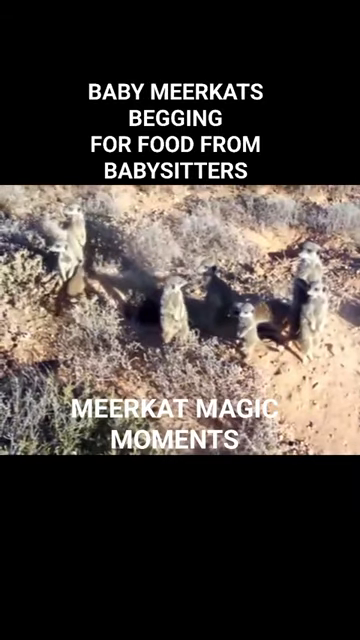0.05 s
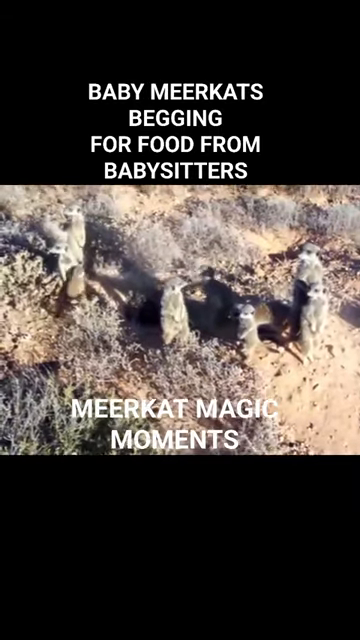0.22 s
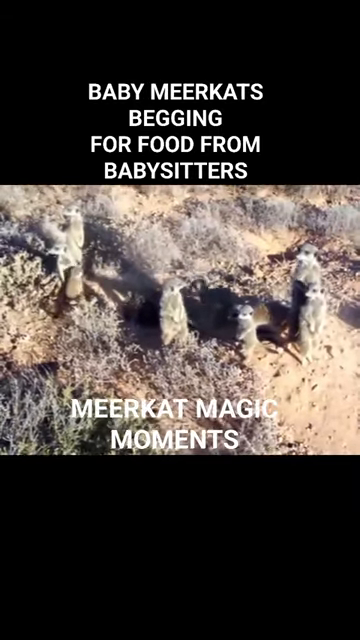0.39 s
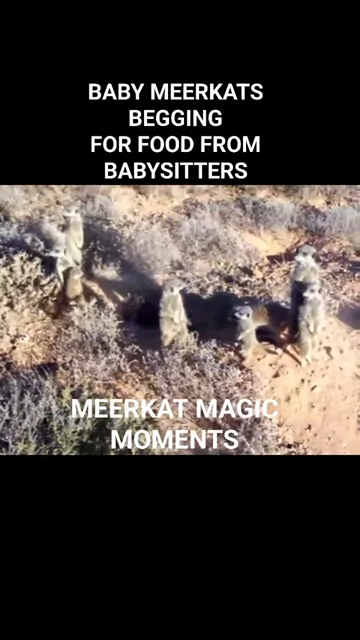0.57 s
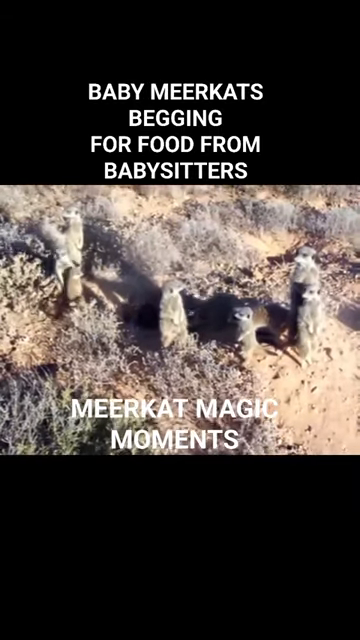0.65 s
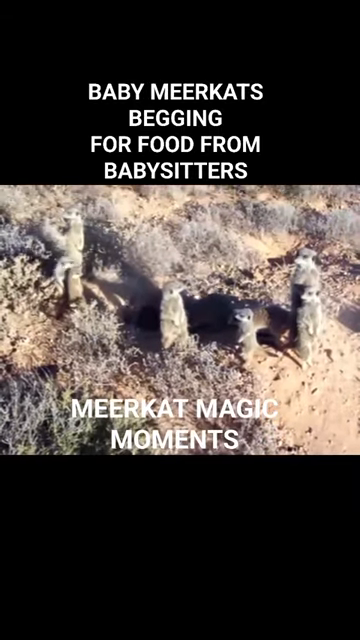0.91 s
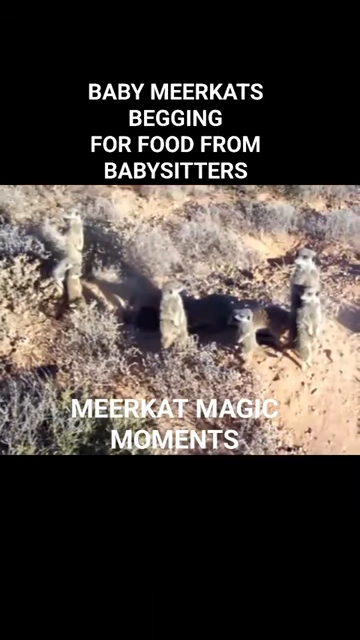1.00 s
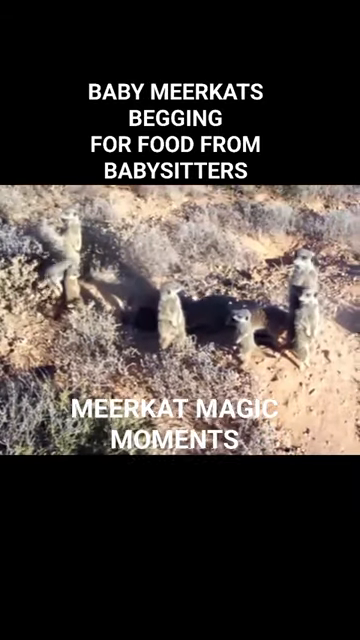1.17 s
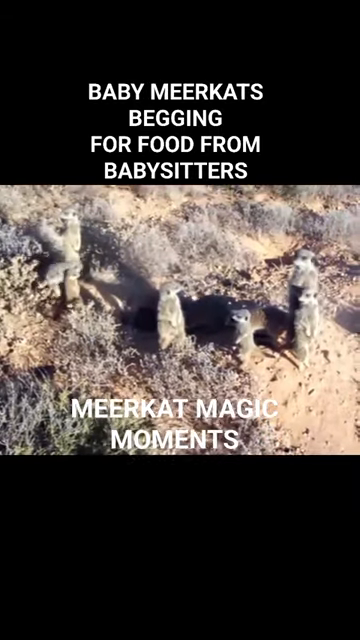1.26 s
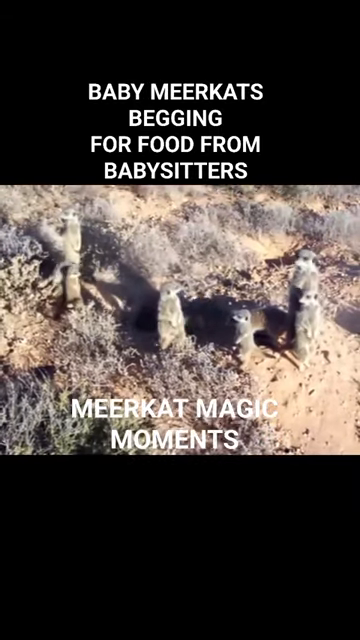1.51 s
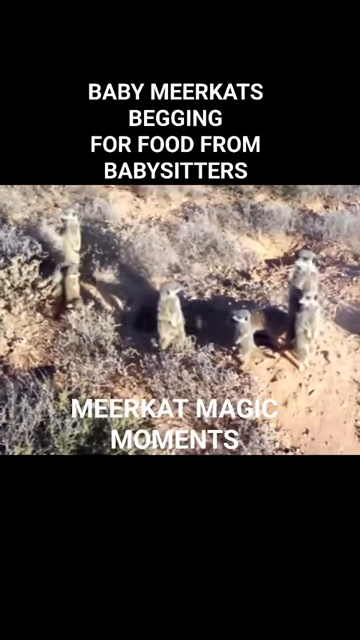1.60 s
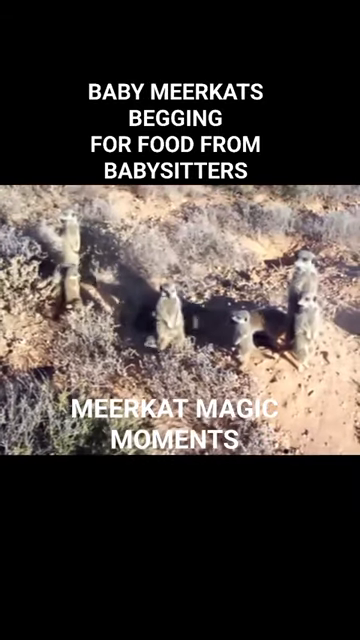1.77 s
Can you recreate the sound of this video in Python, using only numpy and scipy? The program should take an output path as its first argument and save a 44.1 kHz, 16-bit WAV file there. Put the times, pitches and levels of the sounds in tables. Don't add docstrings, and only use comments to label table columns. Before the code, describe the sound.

Outdoors on dry ground, a loud snap falls between quick pup chirps, then a meerkat pup's raspy trembling squeal lasts under a second, followed by faint chirps, leaf rustle and tiny clicks over low air noise, nearly mono.

```python
import sys
import numpy as np
from scipy import signal
from scipy.fft import rfft, irfft
from scipy.io import wavfile
from scipy.ndimage import uniform_filter1d

SR = 44100
rng = np.random.default_rng(int(sys.argv[2]) if len(sys.argv) > 2 else 0)


def amplitude_ratio(level_db):
    exponent = np.asarray(level_db, float) / 20
    return 10 ** exponent


def persist_wave(psi):
    counts = np.round(np.clip(psi, -1, 1) * 32767).astype(np.int16)
    wavfile.write(sys.argv[1], SR, np.atleast_2d(counts).T)


N = 81585
T = np.arange(N) / SR

# frequency_hz, density_db
AIR_SPECTRUM = [(22, -9.5), (75, -3), (250, -6), (530, -8), (900, -14), (1500, -15.5), (7000, -26.5),
                (11000, -35.5)]
# low_hz, high_hz,
# lost_share_of_time
SIDE_BANDS = [(4200, 4800, .95), (4800, 5400, .7), (5400, 6200, .3), (6200, 7000, .15), (7000, 7900, .1)]
# start_s, length_s, first_hz, last_hz, level_db
HOOT_TONES = [(0.024, 0.09, 535.5, 553, -59.5), (.002, 0.027, 565, 535, -62),
              (1.562, 0.0078, 907, 880, -49), (.006, 0.051, 1286, 1330, -61.5),
              (0.055, 0.035, 1250, 1288, -57.5), (0.059, 0.046, 266, 231, -54),
              (0.445, 0.044, 650, 654, -55.5), (0.45, 0.014, 6840, 7000, -63),
              (0.49, 0.037, 6680, 6500, -62.5), (0.663, 0.0293, 837, 1020, -47),
              (0.727, 0.036, 776, 802, -47.5), (0.854, 0.052, 223.6, 229, -50.5),
              (0.872, 0.02743, 855, 990, -53.5), (1.214, 0.027, 694.6, 766, -51),
              (1.223, 0.018, 1543, 1440, -50), (1.227, 0.026, 4334, 4060, -64),
              (1.539, 0.021, 813, 910, -57)]
# start_s, length_s, crest_hz, level_db, brightness_db_per_multiple above the third
ARCHED_CHIRPS = [
    (0.197, 0.0384, 1075, -44, -4.5),
    (0.331, 0.038, 974, -42.5, -5),
]
# start_s, length_s, crest_hz, level_db, brightness_db_per_multiple
RISING_CHIRPS = [
    (.463, 0.035, 892, -44.5, -5.5),
    (.649, 0.0428, 973.6, -41.5, -1.5),
    (1.412, 0.022, 894, -56.5, 2),
    (1.438, 0.0401, 948, -45, 0.5),
    (1.54, 0.038, 914, -54.5, -10),
]
# multiple, level_db
CHIRP_HARMONICS = [(1, -7.5), (2, 2.5), (3, -5.5), (4, -15), (5, -7), (6, -16.5), (10, -24.5)]
# start_s, peak_db, mode_hz, t60_s
KNOCK_MODES = [
    (.219, -24.5, 252, 0.0067),
    (.366, -41, 78.4, 0.15),
    (.685, -41.5, 244, .03),
    (1.106, -27.5, 510, 0.011),
    (1.2775, -27.5, 672, 0.02),
    (1.843, -40, 800, 0.013),
]
# start_s, length_s, centre_hz, level_db
LEAF_SWELLS = [
    (0.33, 0.03, 4250, -68),
    (1.444, 0.017, 4070, -56),
    (0.48, 0.12, 5740, -55),
    (0.724, 0.13, 6400, -51.5),
    (1.204, 0.26, 4300, -60),
    (1.424, 0.059, 4140, -53.5),
    (1.535, 0.14, 4800, -60),
]
# time_s, flutter_crest_hz, level_db, upper_resonance_hz, upper_strength_db
CALL_PATH = [(0.408, 496.2, -47, 4320, 0), (.422, 521.8, -43.5, 4320, -4.5), (.452, 726.8, -39, 4580, -5.5),
             (.545, 699.3, -41, 4550, 0), (.56, 701, -39.5, 4460, -3.5), (0.677, 704.4, -38.5, 4570, -2.5),
             (.72, 726, -39, 4520, 2.5), (0.92, 782, -38, 4380, 4.5), (1.082, 689, -38, 4330, 4),
             (1.15, 709.7, -37, 4330, 4.5), (1.226, 625, -39, 4250, 0.5)]
# time_s, beats_done
FLUTTER_BEATS = [(.402, -23), (.508, -15), (.708, 0), (.803, 7), (.907, 14), (1.011, 21), (1.122, 28),
                 (1.171, 31), (1.229, 32)]
# time_s, pitch_share_lost_in_dip, roughness_0_to_1
FLUTTER_DEPTH = [(.41, .05, .5), (.45, .24, .6), (.51, .36, .45), (.66, .36, .4), (.8, .24, .42),
                 (1.05, .17, .42), (1.1, .12, .42), (1.17, .08, .3), (1.23, .08, .35)]
# frequency_hz, gain_db
THROAT_COLOUR = [(650, -12.5), (1050, -17.5), (1300, -3), (1750, 2.5), (2300, -8.5), (2900, -8.5),
                 (3500, -18.5), (12000, -29)]
# start_s, length_s, resonance_hz, boost_db
CAVITY_RINGS = [
    (0.41, .045, 3550, 3),
    (.43, 0.035, 4870, 3),
    (0.486, 0.049, 4780, -2),
    (0.498, 0.027, 4320, 3),
    (0.549, .132, 4804, 6.5),
    (.555, .12, 4340, 4),
    (0.73, 0.27, 2760, -1),
]
# start_s, peak_db, centre_hz, decay_s
GRIT_TICKS = [
    (1.0652, -25, 4870, 0.001),
    (1.3, -39.5, 4700, 0.0069),
    (1.334, -49, 5400, .004),
    (1.397, -33.5, 4270, 0.0017),
    (1.624, -45, 5480, .003),
    (1.7976, -28.5, 4800, 0.001),
    (1.8, -36.5, 7440, 0.00069),
    (1.844, -41.5, 3170, 0.0025),
]
# from_hz, gain_db
TREBLE_LOSS = [(6800, -2), (7750, -9.5), (9700, -16), (10350, -30.5), (12150, -37), (14200, -54.5)]

SNAP_S = 0.22173
FALL_SHARE = 0.3
CALL_EDGE_S = 0.008


def at_hz(points, hz):
    points = np.array(points)
    return np.interp(np.log(hz), np.log(points[:, 0]), points[:, 1])


def rms_one(x):
    return x / np.sqrt(np.mean(x ** 2) + 1e-20)


def band(x, low_hz, high_hz):
    return signal.sosfilt(signal.butter(2, [low_hz, high_hz], "band", fs=SR, output="sos"), x)


def drift(rate_hz):
    r, run_in = np.exp(-2 * np.pi * rate_hz / SR), int(SR / rate_hz)
    noise = rng.standard_normal(N + run_in)
    return rms_one(signal.lfilter([1], [1, -2 * r, r * r], noise)[run_in:])


def gate(start_s, length_s, edge_s):
    to_nearest_end = np.minimum(T - start_s, start_s + length_s - T)
    return np.sin(np.pi / 2 * np.clip(to_nearest_end / edge_s, 0, 1)) ** 2


def resonance(hz, centre_hz, width_hz):
    return 1 / (1 + ((hz - centre_hz) / width_hz) ** 4)


def air(patchy_db):
    edges = 20 * 2 ** np.arange(0, 9.7, 0.5)
    white, gust = rng.standard_normal((2, N)), drift(1)
    out = np.zeros(N)
    for k, (low_hz, high_hz) in enumerate(zip(edges, edges[1:])):
        level_db = at_hz(AIR_SPECTRUM, np.sqrt(low_hz * high_hz)) + patchy_db * (0.5 * gust + drift(4.9))
        out += amplitude_ratio(level_db) * band(white[k % 2], low_hz, high_hz)
    return rms_one(out)


def drone():
    centre_hz, width_hz = 70.1, 16
    noise = rng.standard_normal(N + SR)
    return rms_one(band(noise, centre_hz - width_hz / 2, centre_hz + width_hz / 2)[SR:])


def width():
    out, blocks = np.zeros(N), (T * SR / 2048).astype(int)
    dropout = 0.3 + 0.6 * gate(0.77, 0.5, 0.02)
    for low_hz, high_hz, lost in SIDE_BANDS:
        alive = rng.random(N)[blocks] > lost * dropout
        steep = signal.butter(6, [low_hz, high_hz], "band", fs=SR, output="sos")
        hiss = signal.sosfiltfilt(steep, rng.standard_normal(N))
        out += uniform_filter1d(alive * 1.0, size=500) * hiss * amplitude_ratio(3 * drift(8.8))
    out = rms_one(out)
    for mono_s in (0.207, 1.787):
        out *= 1 - gate(mono_s, 0.026, 0.0027)
    return amplitude_ratio(-64.5) * out


def hoots():
    out = np.zeros(N)
    for start_s, length_s, first_hz, last_hz, level_db in HOOT_TONES:
        pitch_hz = np.interp(T, [start_s, start_s + length_s], [first_hz, last_hz])
        tone = np.sin(2 * np.pi * np.cumsum(pitch_hz) / SR)
        waver = 1 + (0.25 + first_hz / 12000) * drift(100)
        out += amplitude_ratio(level_db) * 2.12 * gate(start_s, length_s, 0.0037) * waver * tone
    return out


def chirps(rows, crest_at, fall_sag):
    rise_sag, edge_s = 0.2, 0.0045
    out = np.zeros(N)
    for start_s, length_s, crest_hz, level_db, tilt_db in rows:
        u = np.clip((T - start_s) / length_s, 0, 1)
        rise = rise_sag * np.abs(1 - u / crest_at) ** 1.617
        fall = fall_sag * ((u - crest_at) / (1 - crest_at)) ** 2
        pitch_hz = crest_hz * (1 - np.where(u < crest_at, rise, fall)) * (1 + 0.00865 * drift(124))
        phase = 2 * np.pi * np.cumsum(pitch_hz) / SR
        voice = np.zeros(N)
        for m, partial_db in CHIRP_HARMONICS:
            waver = 1 + (0.25 + 0.41 * (m > 3.5)) * drift(200)
            voice += amplitude_ratio(partial_db + tilt_db * np.clip(m - 3, 0, 2)) * np.sin(m * phase) * waver
        out += 1.14 * amplitude_ratio(level_db) * gate(start_s, length_s, edge_s) * voice
    return out


def knocks():
    out = np.zeros(N)
    for start_s, peak_db, mode_hz, t60_s in KNOCK_MODES:
        u = np.clip(T - start_s, 0, 1)
        strike = 1 - np.exp(-u / 0.00037)
        out += 1.39 * amplitude_ratio(peak_db - 60 * u / t60_s) * strike * np.sin(2 * np.pi * mode_hz * u)
    return out


def snap():
    low_hz, high_hz, lean_rad = 2480, 6800, -0.95
    f = np.fft.rfftfreq(N, 1 / SR)
    gain = np.where(f < low_hz, 0, np.where(f < high_hz, 1, amplitude_ratio(-17)))
    gain = uniform_filter1d(gain, size=450)
    pulse = irfft(gain * np.exp(-2j * np.pi * f * SNAP_S - 1j * lean_rad), N)
    after = np.exp(-np.clip(T - SNAP_S, 0, 1) / 0.004) * (T > SNAP_S)
    splinter_env = after + amplitude_ratio(-6) * gate(SNAP_S - 0.003, 0.003, 0.001)
    body_env = after + 0.3 * gate(SNAP_S - 0.002, 0.002, 0.001)
    splinters = band(rng.standard_normal(N), 2900, 11000) * splinter_env
    body = band(rng.standard_normal(N), 600, 2600) * body_env
    return 1.13 * pulse / np.abs(pulse).max() + amplitude_ratio(-23) * splinters + amplitude_ratio(-21) * body


def rustles():
    grain = rng.standard_normal(N) * amplitude_ratio(2.5 * drift(300))
    out = np.zeros(N)
    for start_s, length_s, centre_hz, level_db in LEAF_SWELLS:
        hiss = rms_one(band(grain, centre_hz / 1.4, centre_hz * 1.36))
        out += amplitude_ratio(level_db) * gate(start_s, length_s, length_s / 3) * hiss
    return out


def flutter():
    times_s, dip, rough = np.transpose(FLUTTER_DEPTH)
    dip, rough = np.interp(T, times_s, dip), np.interp(T, times_s, rough)
    beat = np.interp(T, *np.transpose(FLUTTER_BEATS)) + 24 + FALL_SHARE
    k, p = beat.astype(int), beat % 1
    depth = np.clip(1 + 0.22 * rng.standard_normal(60) + 0.12 * (-1.0) ** np.arange(60), 0.2, 3)
    depth[56] = 1.5
    falling = np.sin(np.pi / 2 * p / FALL_SHARE) ** 2
    recovering = ((1 - p) / (1 - FALL_SHARE)) ** 2.4
    down = dip * depth[k] * np.where(p < FALL_SHARE, falling, recovering)
    throb_db = 0.5 * depth[k] * np.cos(2 * np.pi * (p - 0.6))
    return uniform_filter1d(down, size=120), rough, throb_db


def begging():
    times_s, *columns = np.transpose(CALL_PATH)
    start_s, end_s = times_s[0], times_s[-1]
    crest_hz, level_db, upper_hz, upper_db = [np.interp(T, times_s, c) for c in columns]
    down, rough, throb_db = flutter()
    pitch_hz = crest_hz * (1 - down) * (1 + 0.0328 * rough * drift(283))
    phase = 2 * np.pi * np.cumsum(pitch_hz) / SR
    upper_gain = amplitude_ratio(upper_db - 23.5 * down)
    onset_gain = amplitude_ratio(-10 - 254 * np.clip(T - times_s[1], 0, 1))
    closing = (1 - amplitude_ratio(-3)) * np.clip((T - 1.14) / 0.031, 0, 1)

    def throat(hz):
        colour = amplitude_ratio(at_hz(THROAT_COLOUR, hz)) + upper_gain * resonance(hz, upper_hz, 323)
        colour = colour + amplitude_ratio(-22) * resonance(hz, 8670, 140) + amplitude_ratio(-26) * resonance(hz, 12400, 140)
        return colour * (1 - closing * resonance(hz, 3130, 600)) + onset_gain * resonance(hz, 3520, 400)

    tone, breath = np.zeros(N), np.zeros(N)
    for m in range(1, 19):
        tone += throat(m * pitch_hz) * np.sin(m * phase + m * m) * (1 + 0.38 * rough * drift(100))
    for hz in np.geomspace(1200, 11000, 14):
        breath += throat(hz) * band(rng.standard_normal(N), hz / 1.083, hz * 1.224) / 60
    breath *= 1 + 0.5 * np.cos(phase)
    steady = slice(int(0.7 * SR), int(1.1 * SR))
    tone, breath = tone / tone[steady].std(), breath / breath[steady].std()
    voice = tone * np.sqrt(1 - np.clip(rough, 0, 1) ** 2) + 0.53 * rough * breath
    rings = np.zeros(N)
    for ring_s, length_s, hz, boost_db in CAVITY_RINGS:
        rings += amplitude_ratio(boost_db) * gate(ring_s, length_s, 0.01) * band(voice, hz - 165, hz + 165)
    sigh = amplitude_ratio(level_db - 11) * breath * gate(end_s - 0.005, 0.033, CALL_EDGE_S)
    envelope = gate(start_s, end_s - start_s + CALL_EDGE_S, CALL_EDGE_S)
    return (voice + rings) * amplitude_ratio(level_db - 2.5 * down + throb_db) * envelope + sigh


def grit():
    out, white = np.zeros(N), rng.standard_normal(N)
    for start_s, peak_db, centre_hz, decay_s in GRIT_TICKS:
        burst = white * np.exp(-np.clip(T - start_s, 0, 1) / decay_s) * (T > start_s)
        out += amplitude_ratio(peak_db) * band(burst, centre_hz / 1.6, centre_hz * 1.4)
    return out


def ground_echo(voices):
    lag = int(0.0028 * SR)
    return voices + amplitude_ratio(-22) * np.r_[np.zeros(lag), voices[:-lag]]


def scene():
    voices = hoots() + begging()
    voices += chirps(ARCHED_CHIRPS, crest_at=0.6, fall_sag=0.25)
    voices += chirps(RISING_CHIRPS, crest_at=0.68, fall_sag=0.11)
    background = amplitude_ratio(-49.5) * air(patchy_db=1.5) + amplitude_ratio(-51.5) * drone()
    debris = knocks() + snap() + rustles() + grit()
    middle = ground_echo(voices) + debris + background
    side = width()
    return np.array([middle + side, middle - side])


def roll_off(x):
    return signal.sosfilt(signal.butter(12, 15750, fs=SR, output="sos"), x)


def record(dry):
    f, gain = np.fft.rfftfreq(N, 1 / SR), np.ones(N // 2 + 1)
    for from_hz, gain_db in TREBLE_LOSS:
        gain[f > from_hz] = amplitude_ratio(gain_db)
    ducked = dry * amplitude_ratio(-6 * gate(0.232, 0.022, 0.006))
    mix = irfft(rfft(ducked) * uniform_filter1d(gain, size=700), N)
    return roll_off(mix)


dry = scene()
out = record(dry)
persist_wave(out)
```